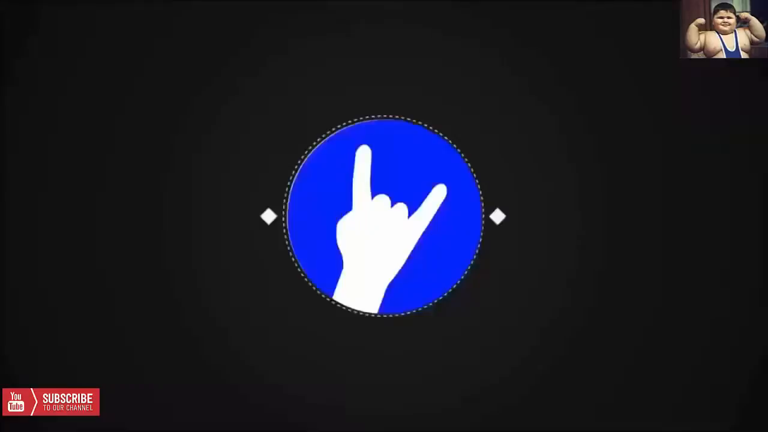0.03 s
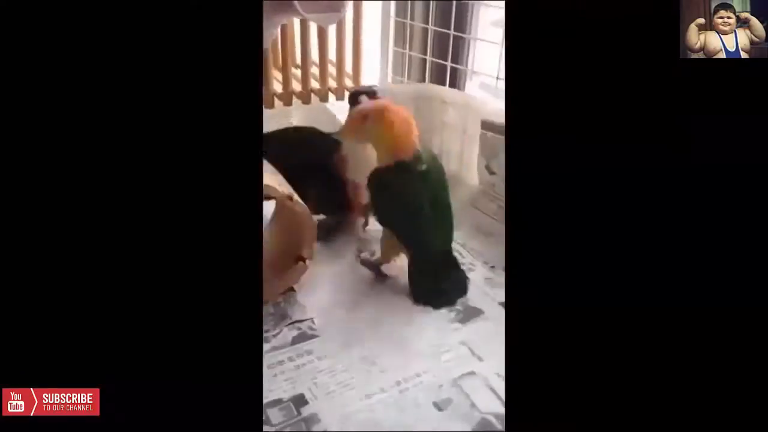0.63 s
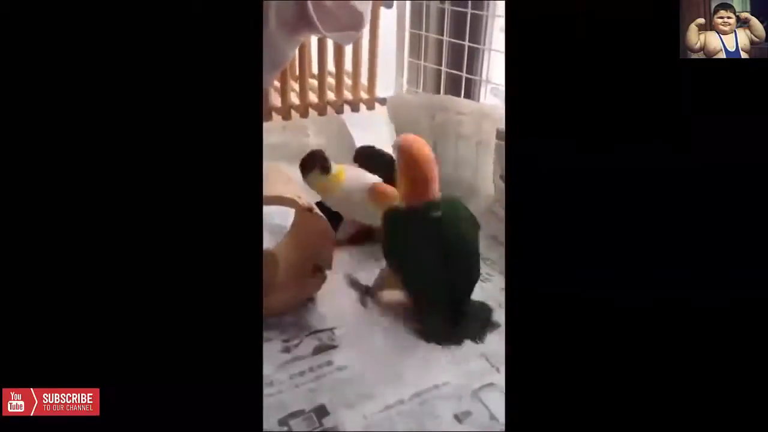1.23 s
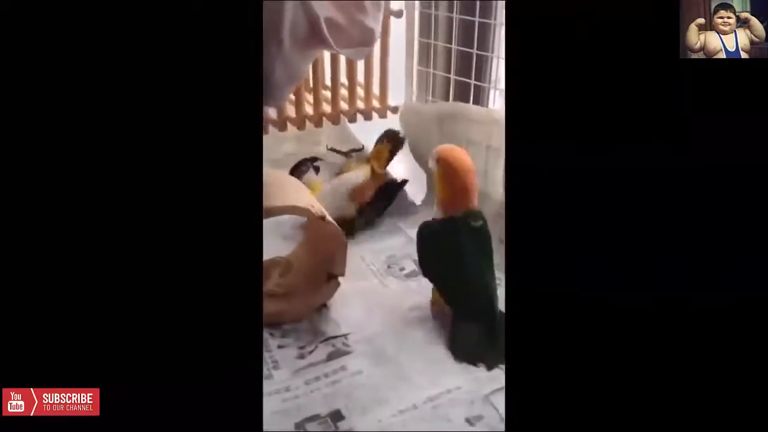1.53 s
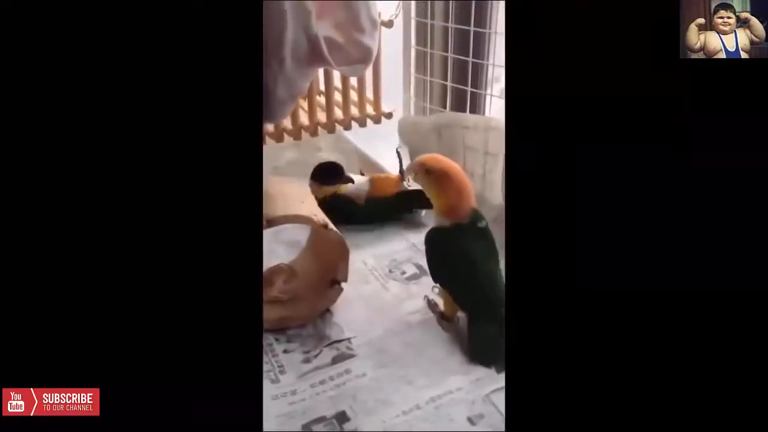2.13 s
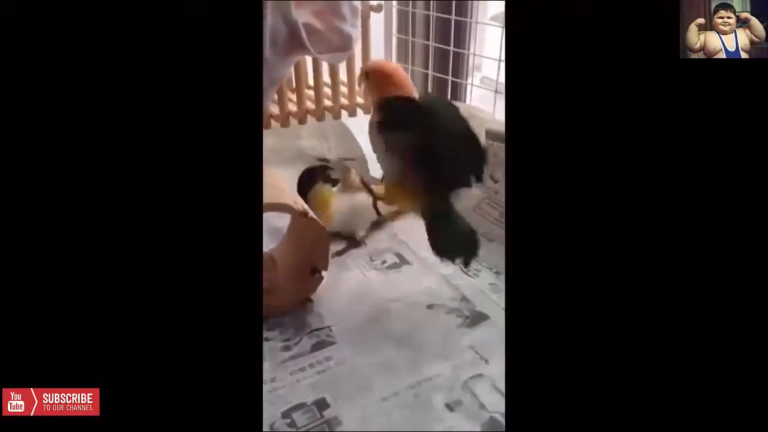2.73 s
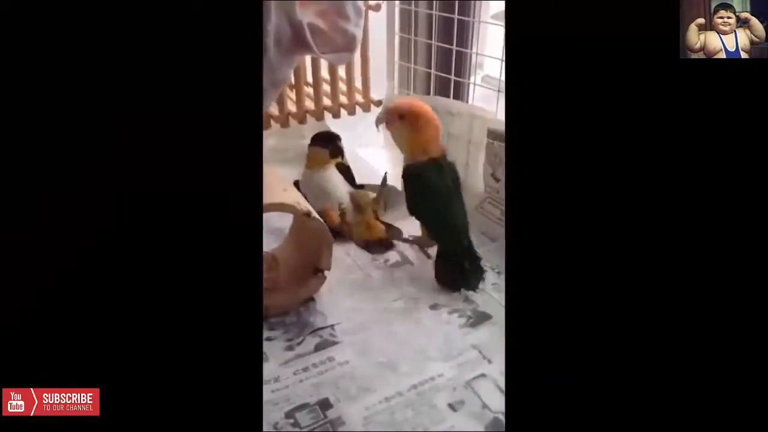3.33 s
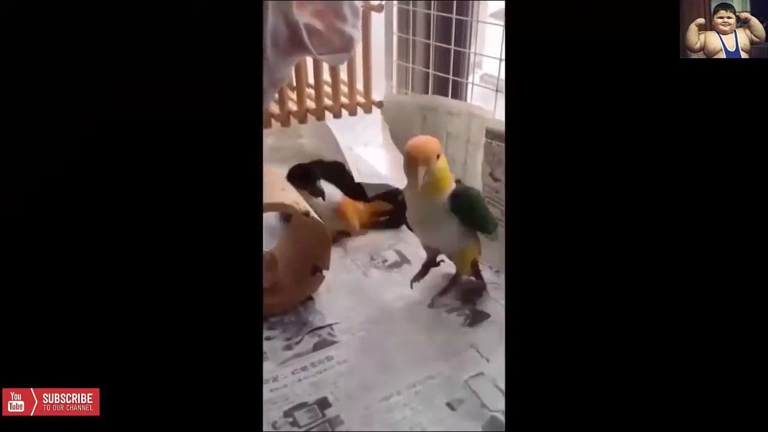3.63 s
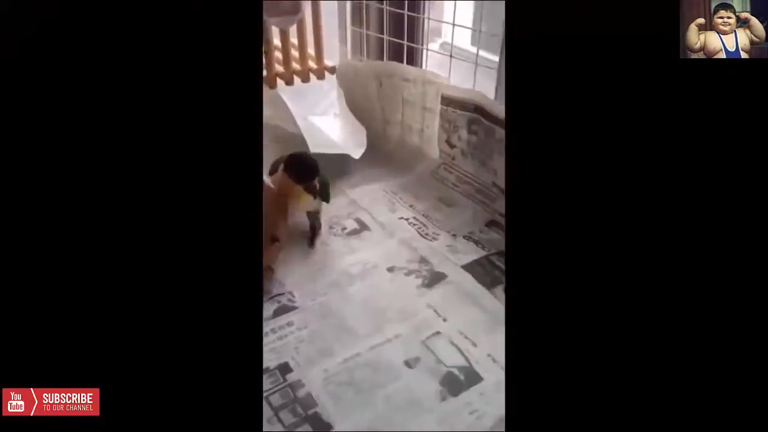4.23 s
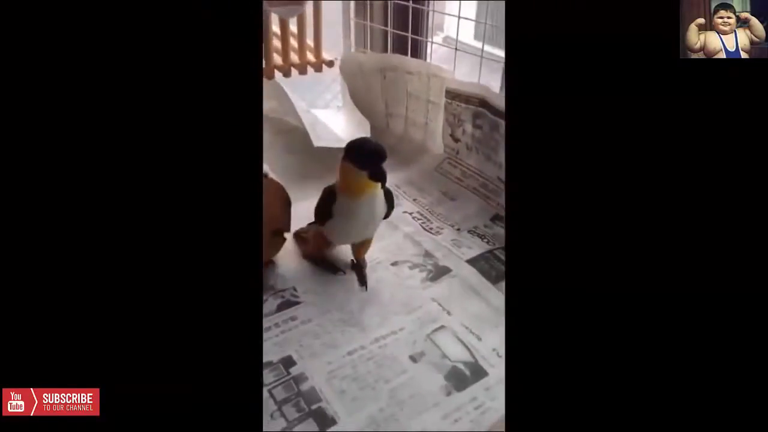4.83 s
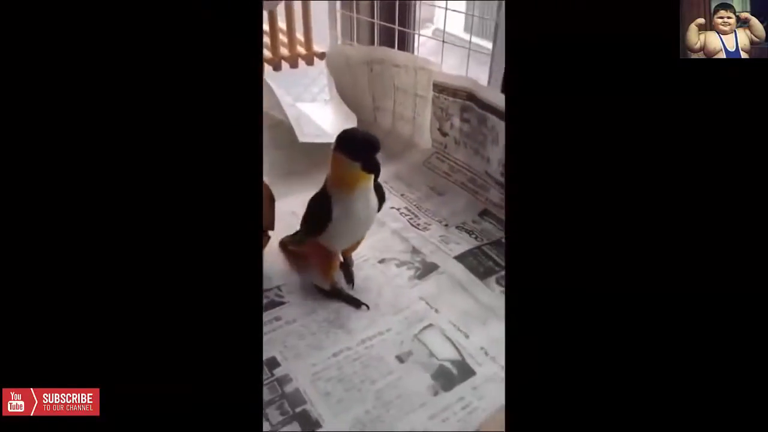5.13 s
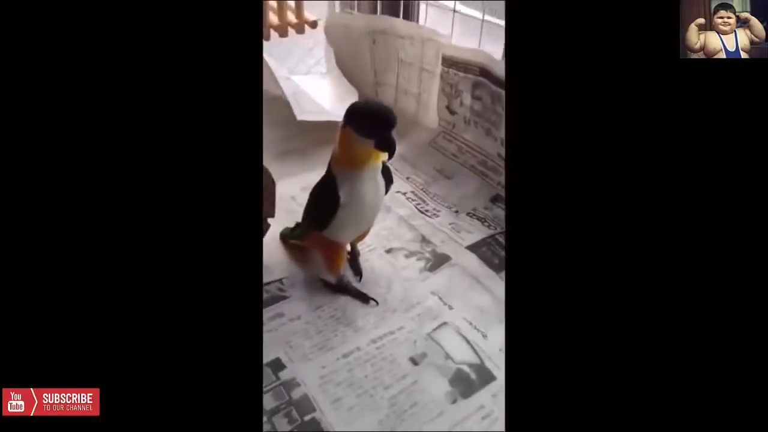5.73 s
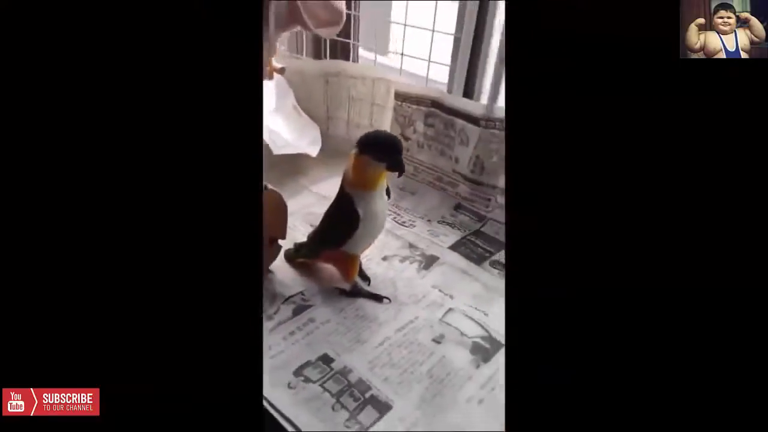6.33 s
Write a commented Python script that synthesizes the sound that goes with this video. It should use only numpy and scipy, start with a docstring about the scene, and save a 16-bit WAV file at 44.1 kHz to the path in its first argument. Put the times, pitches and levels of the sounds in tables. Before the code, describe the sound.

After a moment of silence, at about 0.5 seconds, two small parrots are heard scuffling on newspaper in an indoor pen, close to the microphone. Their feet slap and crackle the sheet in quick, uneven taps, feathers swish over it, and bodies bump softly on the floor. A short, high squawk breaks upward at 0.7 seconds. A raspy rattle runs from 1.6 to 1.9 seconds, followed by four quick chirps between 2 and 2.5 seconds, the third loudest. Shuffling and hopping continue, with a strong slap near 3 seconds. A few knocks of beak or claw on wood fall between 3.7 and 5.2 seconds, the sharpest at 4.3. The rustling thins as one bird hops on, landing hard at 5.2 seconds, then taking lighter steps until about 6.2. Soft room noise and a faint low drone lie underneath, with slight echo.

```python
"""Indoors, a walled pen lined with newspaper, a phone microphone close by.
Two small parrots tussle, then one hops across the sheet. Feet slap and crackle the paper, feathers
and tails brush over it, bodies bump the floor and a beak or claw knocks on wood. One bird gives a
squawk, a rattle and four chirps, all pulsed by its syrinx. The pen walls and the room answer over
a faint drone; the phone's limiter flattens the loudest peaks."""
import sys
import numpy as np
from scipy import signal
from scipy.fft import rfft, irfft
from scipy.io import wavfile
from scipy.ndimage import uniform_filter1d, minimum_filter1d, map_coordinates

SR = 44100
rng = np.random.default_rng(int(sys.argv[2]) if len(sys.argv) > 2 else 0)


def transcribe(signal):
    """Save signal, clipped to [-1, 1], as a 16-bit WAV file at the path in sys.argv[1]."""
    frames = np.atleast_2d(signal).T
    limited = np.clip(frames, -1, 1)
    pcm = np.round(limited * 32767).astype(np.int16)
    wavfile.write(sys.argv[1], SR, pcm)


N = 281358
T = np.arange(N) / SR

# steady shuffling on the paper, dying down once one bird has left: time_s, level_db, hiss_offset_db
SHUFFLE = [(.46, -40, 1.5), (.6, -32, -1), (.91, -43.5, 8), (1.32, -31, 0.5), (1.58, -39, 0.5),
           (1.8, -40, 5.5), (2.2, -40.5, -7), (2.42, -32, -2), (2.8, -32, -3), (2.95, -40.5, 0.5),
           (3.5, -42.5, 5), (3.8, -32, -4.5), (4.1, -40, 1), (4.22, -44.5, -6.5), (4.5, -50, -2),
           (5.17, -61, 2), (5.45, -32, -7), (5.65, -57, -12)]


def steps(rise_s=0.00075, release_s=0.0055, flap_s=0.011, ring_s=0.0013, ring_db=-6):
    """Each foot crushes the sheet: clicks ring that patch of paper, and the sheet thuds on the floor."""
    # spectra of the slap, the crackle, the smallest creases and the thud: frequency_hz, density_db
    slap = [(700, -39.5), (1200, -11), (1700, -2.5), (2800, -2.5), (4800, -2), (6000, -9.5), (7500, -12.5),
            (11000, -49.5)]
    crackle = [(3500, -16.5), (5200, -2), (6500, -1), (8200, -4), (10000, -12), (12500, -10), (16000, -17)]
    fine_crackle = [(6500, -37), (8500, 2.5), (10000, 0.5), (13000, -5.5), (15500, -8), (17000, -43)]
    thud = [(30, -29), (70, -23), (110, -15), (230, -1.5), (330, -4.5), (520, -3), (630, 0.5), (780, 4.5),
            (1050, -2.5), (1400, -2.5), (2200, -29.5)]
    grains = [colour(clicks(rate=14000, spread_db=1.6) * undb(1.6 * walk(400)), spectrum)
              for spectrum in (slap, crackle, fine_crackle, thud)]
    fades_s = (release_s, release_s, release_s, flap_s)  # the sheet flaps longer than it crackles
    t = np.arange(SR // 14) / SR
    out = np.zeros(N)
    for start, contact, db, crackle_db, thud_db in footfalls():
        patch = rng.standard_normal(SR // 250) * np.exp(-t[:SR // 250] / ring_s)
        patch *= undb(ring_db) / np.linalg.norm(patch)
        patch[0] = 1  # the click itself, ahead of its ring
        # a sharper scrape buckles ever smaller creases
        shares_db = (0, crackle_db + 0.5, 1.23 * crackle_db - 4, thud_db)
        for grain, share_db, fade_s in zip(grains, shares_db, fades_s):
            force = (1 - np.exp(-t / rise_s)) * np.exp(-np.maximum(t - contact, 0) / fade_s)
            burst = np.convolve(force * grain[int(start * SR):][:len(t)], patch)[:len(t)]
            add(out, unit(burst) * undb(db + share_db) * rms(force), start)
    return out


def footfalls(tap_count=22):
    """Every foot contact, in the columns of a single step: steps, both feet of each hop, claw taps."""
    # one foot coming down: start_s, contact_s, level_db, crackle_offset_db, thud_offset_db
    single_steps = [(.49, 0.018, -29, -5, -0.5), (.6246, 0.0041, -12.5, -7, -9.5),
                    (1.003, 0.0051, -31, -12, -7.5), (1.447, 0.0049, -26.5, -13, -5),
                    (1.533, 0.0094, -31, -7, -7), (2.256, 0.016, -26.5, -4.5, -1.5),
                    (2.624, .0055, -33.5, 7, -21), (2.67, 0.0047, -24.5, 5, -12),
                    (2.972, 0.01, -12, -0.5, -10), (3.06, .003, -29, -16, -2),
                    (3.328, .004, -34.5, -5, 6.5), (3.66, .004, -41.5, -8, 10.5),
                    (3.889, 0.022, -32, -5, -5), (3.974, .0034, -32.5, -3, -13),
                    (4.049, 0.0076, -30, 3, -23), (4.145, 0.017, -28.5, -2.5, -12),
                    (4.417, .0044, -31.5, -1, -22), (4.493, 0.014, -25.5, 0, -12.5),
                    (5.111, 0.0058, -32.5, 1.5, -9), (5.166, .005, -36.5, 0, -4),
                    (5.206, 0.019, -6, -5.5, -6), (5.617, 0.0036, -35.5, -16, 2),
                    (5.966, 0.027, -27, -2, -1), (6.219, 0.033, -20, -8.5, -4.5)]
    # two-footed landings: the same five columns, then second_foot_lag_s, second_foot_offset_db
    hops = [(.558, 0.022, -25, -2, -8, 0.025, 2), (0.82, 0.0079, -11.5, -5.5, -8, .042, -7),
            (1.172, 0.011, -11, -0.5, -13.5, 0.02, -5.5), (1.266, 0.0045, -26.5, -1.5, -12, 0.012, 5.5),
            (1.364, 0.0066, -17.5, -3, -10, 0.016, -9), (2.553, 0.019, -26, -7.5, -5.5, 0.025, 2.5),
            (2.733, 0.014, -26, -2, -7, 0.026, -2), (3.527, 0.015, -26.5, 0, -4.5, .03, 0.5),
            (3.822, 0.01, -24.5, 4, -4, .021, -8.5), (4.076, 0.01, -31.5, 11.5, 2.5, 0.017, -3),
            (4.336, 0.015, -22, -0.5, -1.5, 0.017, -2.5), (4.609, .016, -14, -3, -11, .015, 1.5),
            (4.746, 0.024, -26.5, -9, -12, 0.018, 3.5), (4.884, 0.014, -19.5, -7.5, -8.5, .019, 0.5),
            (4.924, 0.01, -22, 0.5, -11.5, 0.015, -4), (5.321, 0.016, -30.5, -12.5, -3, .019, 3),
            (5.427, 0.033, -27, -15, -4, 0.012, 4), (5.695, 0.017, -26.5, -2.5, -5.5, 0.026, 2.5)]
    feet = list(single_steps)
    for start, contact, db, crackle_db, thud_db, lag, second_db in hops:
        feet.append((start, contact, db, crackle_db, thud_db))
        # the second foot crackles more: it lands on paper that is already taut
        feet.append((start + lag, contact, db + second_db, crackle_db + 1, thud_db))
    # light taps fall at random, about as strong as the shuffling of the moment
    times, shuffle_db, _ = np.transpose(SHUFFLE)
    for when, force in rng.random((tap_count, 2)):
        start = 0.5 + 5.5 * when
        db = np.interp(start, times, shuffle_db) + 1 + 4 * (2 * force - 1)
        feet.append((start, 0.004, db, -3, 2))
    return feet


def parrot():
    """A squawk, a slow rattle whose ring sags, and four quick chirps that swell, hold and let go."""
    # the squawk breaks from a low to a high register: time_s, level_db, pitch_hz
    squawk = [(.72, -31, 2402), (.735, -21, 2003), (.739, -12, 1763), (.746, -8, 1710), (.749, -5, 3050),
              (0.755, -1, 3225), (0.768, -14, 3220), (.785, -36, 3330)]
    # the rattle starts softly, then pushes twice: time_s, pulse_hz, level_db
    rattle = [(1.621, 47.5, -22), (1.684, 40, -22.5), (1.694, 57.8, -11), (1.725, 56.3, -3.5),
              (1.742, 45.9, -8.5), (1.784, 51.3, -12), (1.81, 52.1, -3.5), (1.85, 54.1, -3.5),
              (1.862, 50, -22)]
    # chirps: start_s, swell_s, hold_s, level_db, pulse_hz, pitch_hz, ring_rise_s, rasp_offset_db
    chirps = [(1.956, 0.03, 0.014, -7.5, 142.6, 1872, 0.0018, -7.5),
              (2.115, 0.033, 0.018, -2, 148.4, 1894, 0.0016, -14.5),
              (2.284, 0.0036, 0.036, 1, 170.3, 1895, 0.0025, -14),
              (2.457, 0.013, 0.0037, -12.5, 146, 1980, .0021, -10)]
    # throat and beak resonances, for harsh calls and for chirps: centre_hz, width_hz, level_db
    harsh_throat = [(1020, 170, -6), (1280, 190, 3), (2130, 260, 0), (2880, 280, 1), (3270, 200, 2),
                    (4200, 600, -4), (5130, 300, -1), (6200, 500, -16)]
    chirp_throat = [(886, 190, 1), (1220, 180, 3), (1910, 330, 4.5), (2800, 500, 1), (3080, 460, -0.5),
                    (4000, 790, -1.5), (6030, 900, -34), (8500, 5400, -15)]
    # partials at 1/2, 1, 3/2, 2 ... times the ring's pitch: level_db
    harsh_partials = [-16, -2, -10.5, -9.5, -25, -19]
    chirp_partials = [-12.5, -0.5, -13.5, -26, -31, -23, -24, -17]
    out = np.zeros(N)
    times, db, pitch_hz = np.transpose(squawk)
    voice = syrinx(times, db, pitch_hz, harsh_throat, harsh_partials, pulse_hz=220,
                   rise_s=0.0041, rasp_db=-13, waver=0.036, rasp_peak=0.24)
    add(out, voice, times[0])
    times, pulse_hz, db = np.transpose(rattle)
    pitch_hz = 2157 - 1100 * (times - times[0])
    voice = syrinx(times, db, pitch_hz, harsh_throat, harsh_partials, pulse_hz,
                   rise_s=0.0018, rasp_db=-8.5, waver=0.0295, rasp_peak=0.22)
    add(out, voice, times[0])
    onset_db, end_db, release_s = -24.5, -33, 0.017  # a chirp's ends, relative to its held level
    for start, swell, hold, level_db, pulse_hz, pitch_hz, rise_s, rasp_db in chirps:
        times = start + np.cumsum([0, swell, hold, release_s])
        db = level_db + np.array([onset_db, 0, 0, end_db])
        voice = syrinx(times, db, pitch_hz, chirp_throat, chirp_partials, pulse_hz,
                       rise_s, rasp_db, waver=0.036, rasp_peak=0.46)
        add(out, voice, start)
    return out


def syrinx(times, db, pitch_hz, throat, partials_db, pulse_hz, rise_s, rasp_db, waver, rasp_peak):
    """The syrinx opens in pulses: each gives a short ring and a rasp of air through the throat."""
    t = np.arange(times[0], times[-1], 1 / SR)
    pulse_hz, db, pitch_hz = (np.interp(t, times, np.broadcast_to(curve, len(times)))
                              for curve in (pulse_hz, db, pitch_hz))
    cycle = np.cumsum(pulse_hz) / SR % 1
    ring = swell_and_fade(cycle / pulse_hz / rise_s) ** 2
    phase = 2 * np.pi * np.cumsum(pitch_hz * (1 + waver * walk(700)[:len(t)])) / SR
    # strong and weak swings alternate, which adds partials halfway between the harmonics
    tone = sum(undb(level) * np.sin(k * phase / 2) for k, level in enumerate(partials_db, 1))
    opening = swell_and_fade(cycle / rasp_peak) ** 0.53
    air = resonant_noise(throat, count=SR // 2)
    # beak and tongue keep moving, so the resonances drift from pulse to pulse
    drift = np.cumsum(1 + 0.025 * walk(50)[:len(t)])
    breath_db = 0.36 * (db.max() - db)  # a softer voice is breathier
    rasp = opening * undb(breath_db + rasp_db) * map_coordinates(air, [drift], order=3)
    strength = undb(db + 1.5 * walk(119.5)[:len(t)])
    return strength * (ring * tone + rasp) * signal.windows.tukey(len(t), 0.04)


def rustle(catch_db=2.0, catch_hz=70):
    """Feathers catch and slip on the paper: a grainy brush with a finer hiss above it."""
    # spectra of feathers sliding on paper: frequency_hz, density_db
    brush_spectrum = [(50, -29), (130, -12.5), (260, 0), (450, -3), (800, 0), (1400, 2), (2500, 1.5),
                      (5000, 0.5), (6500, -3.5), (9000, -27)]
    hiss_spectrum = [(3500, -20), (5500, 0), (7500, 3.5), (10500, 1.5), (13500, 3.5), (15700, -1.5),
                     (17000, -34)]
    brush_gain, hiss_gain = sliding()
    brush = undb(-3) * colour(clicks(rate=6000, spread_db=0), brush_spectrum)
    hiss = colour(clicks(rate=9000, spread_db=2.6), hiss_spectrum)
    return undb(catch_db * walk(catch_hz)) * (brush_gain * brush + hiss_gain * hiss)


def sliding():
    """Gains of brush and hiss: steady shuffling plus a smooth swell for each swish; their powers add."""
    # a wing or tail sweeping over the paper: middle_s, length_s, level_db, hiss_offset_db
    swishes = [(0.771, 0.16, -24, -5), (0.982, 0.099, -34, 5), (1.062, .08, -33, -9), (1.24, 0.12, -33, -1),
               (1.42, .11, -24, -4.5), (1.699, 0.068, -34.5, 5), (2.055, 0.16, -43.5, 7.5),
               (2.525, 0.08, -22.5, -9), (2.61, 0.058, -29, -2), (2.86, 0.11, -33.5, -1),
               (3.267, 0.29, -36, 5.5), (3.451, 0.052, -35.5, 4), (3.583, 0.088, -33, 3.5),
               (3.713, 0.12, -38.5, 8.5), (4.467, 0.16, -32.5, -2.5), (4.706, 0.3, -37.5, -7),
               (4.982, 0.13, -26.5, -7), (5.032, 0.079, -36.5, 6.5), (5.8, 0.11, -45.5, -0.5),
               (6.08, 0.16, -46, 0.5)]
    times, db, hiss_db = np.transpose(SHUFFLE)
    brush_power = undb(np.interp(T, times, db)) ** 2
    hiss_power = undb(np.interp(T, times, db + hiss_db)) ** 2
    for middle, length, db, hiss_db in swishes:
        sweep = np.hanning(int(length * SR))
        add(brush_power, sweep * undb(db) ** 2, middle - length / 2)
        add(hiss_power, sweep * undb(db + hiss_db) ** 2, middle - length / 2)
    return np.sqrt(brush_power), np.sqrt(hiss_power)


def knocks(scatter_db=2):
    """Hard taps ring the wood briefly, each spot with its own mix of modes."""
    # beak or claw striking wood through the paper: start_s, level_db
    strikes = [(3.661, -24.5), (4.092, -35), (4.163, -20), (4.3351, -4), (5.208, -15)]
    # modes of the wood: pitch_hz, level_db, t60_s
    wood = [(830, -5.5, 0.04), (980, -12, 0.026), (1280, -4.5, 0.013), (1636, 0, 0.02), (2250, -9, 0.025),
            (2820, -13, 0.022), (3030, -16.5, 0.054)]
    t = np.arange(SR // 10) / SR
    hz, db, t60 = np.transpose(wood)
    modes = np.sin(2 * np.pi * hz[:, None] * t) * np.exp(-np.log(1000) * t / t60[:, None])
    out = np.zeros(N)
    for start, level_db in strikes:
        gains = undb(level_db + db + scatter_db * rng.standard_normal(len(db)))
        signs = rng.choice([-1, 1], len(db))
        add(out, (gains * signs) @ modes, start)
    return out


def bumps(swell_s=0.0096):
    """Soft, low knocks of a body on the floor under the paper."""
    # bodies and wings meeting the floor: start_s, level_db
    impacts = [(.585, -50), (.748, -39), (.824, -45), (1.174, -28), (2.295, -40), (2.973, -44),
               (3.826, -33), (4.079, -29), (4.15, -41), (4.345, -32), (4.615, -39), (5.21, -30)]
    # spectrum of the bumped floor: frequency_hz, density_db
    floor_spectrum = [(25, -19), (45, -17), (80, 3), (118, 10), (170, -4), (250, -12.5), (340, 10),
                      (480, -12), (800, -16)]
    force = swell_and_fade(np.arange(SR // 8) / SR / swell_s)
    floor = colour(rng.standard_normal(N), floor_spectrum)
    out = np.zeros(N)
    for start, db in impacts:
        knock = unit(force * floor[int(start * SR):][:len(force)])
        add(out, knock * undb(db - 2) * rms(force), start)
    return out


def pen(x, near_db, near_t60, room_db, room_t60=0.21, room_hz=5000):
    """The direct sound, first echoes off the pen's walls, their quick flutter, the room's duller tail."""
    # first echoes from the floor and the walls: delay_s, level_db
    walls = [(.0013, -66), (.0029, -24), (.0047, -34), (.0071, -36)]
    t = np.arange(SR // 2) / SR
    near = rng.standard_normal(len(t)) * (t > 0.007) * np.exp(-np.log(1000) * t / near_t60)
    far = rng.standard_normal(len(t)) * (t > 0.015) * np.exp(-np.log(1000) * t / room_t60)
    far = signal.lfilter(*signal.butter(1, room_hz, fs=SR), far)
    echoes = undb(near_db) * near / np.linalg.norm(near) + undb(room_db) * far / np.linalg.norm(far)
    for delay, db in walls:
        echoes[int(delay * SR)] += undb(db)
    return x + signal.fftconvolve(x, echoes)[:N]


def room_tone(air_db=-41.5, drone_db=-53, sway_db=1.75):
    """Soft room noise that sways in level, with a faint drone."""
    # spectrum of the room's noise: frequency_hz, density_db
    air_spectrum = [(25, -38), (60, -41), (110, -7), (170, -8), (250, 2), (340, -7), (520, -5.5), (850, 0),
                    (1400, -8), (2500, -16), (6000, -18), (15000, -20)]
    # low tones of the room: centre_hz, width_hz, level_db
    drone = [(266.4, 15, -1), (594, 16, -12.5)]
    air = unit(colour(rng.standard_normal(N), air_spectrum)) * undb(air_db + sway_db * walk(5.09))
    return air + undb(drone_db) * resonant_noise(drone, N)


def clicks(rate, spread_db):
    """Dense buckling clicks of paper, rate a second: many small, a few large; rms 1."""
    size = undb(spread_db * np.minimum(rng.exponential(size=N), 5))
    return unit((rng.random(N) < rate / SR) * size * rng.standard_normal(N))


def resonant_noise(modes, count):
    """Noise of rms 1 in steep resonances: centre_hz, width_hz, level_db."""
    out = 0
    for hz, width, db in modes:
        b, a = signal.iirpeak(hz, hz / (1.38 * width), fs=SR)
        out = out + undb(db) * signal.lfilter(b, a, signal.lfilter(b, a, rng.standard_normal(count)))
    return unit(out)


def colour(x, points, size=2048):
    """Causal filter through (frequency_hz, density_db) points that keeps the power of white noise."""
    hz, db = np.transpose(points)
    bins_hz = np.arange(size // 2 + 1) * SR / size
    gain = undb(np.interp(np.log(bins_hz + 1), np.log(hz), db))
    cepstrum = irfft(np.log(gain))
    cepstrum[1:size // 2] *= 2  # folded for minimum phase
    cepstrum[size // 2 + 1:] = 0
    response = irfft(np.exp(rfft(cepstrum)))
    return signal.fftconvolve(x, response / np.linalg.norm(response))[:len(x)]


def walk(rate):
    """Random levels held 1 / rate s and slewed; spread near 1."""
    hold = max(int(SR / rate), 1)
    return uniform_filter1d(np.repeat(rng.standard_normal(N // hold + 1), hold), hold)[:N]


def swell_and_fade(age):
    """Envelope that rises to 1 at age 1, then dies away."""
    return age * np.exp(1 - age)


def undb(db):
    """Decibels to gain."""
    return 10 ** (np.asarray(db) / 20)


def rms(x):
    """Root mean square level."""
    return np.sqrt(np.mean(x ** 2))


def unit(x):
    """Scale a sound to rms 1."""
    return x / rms(x)


def add(track, sound, start_s):
    """Mix a sound into a track."""
    i = int(start_s * SR)
    track[i:i + len(sound)] += sound[:N - i]


def scene():
    """Feet, feathers and calls close by in the pen, over the room tone; mono."""
    scuffle = pen(steps() + knocks() + bumps() + rustle(), near_db=-11.5, near_t60=0.075, room_db=-18.5)
    calls = pen(parrot(), near_db=-12, near_t60=0.12, room_db=-22)
    return (scuffle + calls + room_tone())[None]


def record(dry):
    """The phone opens after a moment's silence, limits the peaks and cuts the top."""
    start_s, fade_s, top_hz = 0.4573, 0.019, 15700
    ceiling, hold = 0.75, SR // 1500
    x = dry * np.clip((T - start_s) / fade_s, 0, 1)
    needed_gain = ceiling / np.maximum(np.abs(x), ceiling)
    gain = uniform_filter1d(minimum_filter1d(needed_gain, hold), hold)
    return signal.sosfiltfilt(signal.ellip(8, 0.1, 50, top_hz, fs=SR, output="sos"), x * gain)


dry = scene()
out = record(dry)
transcribe(out)
```